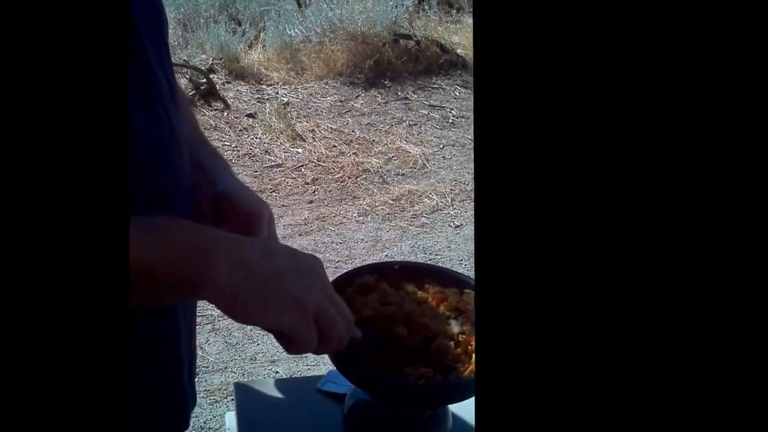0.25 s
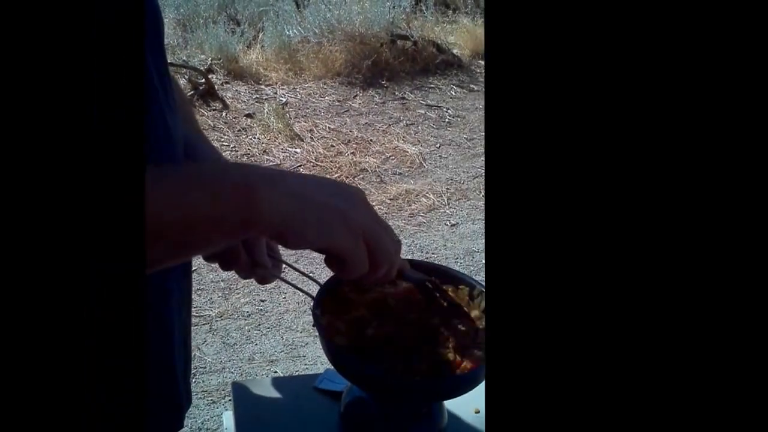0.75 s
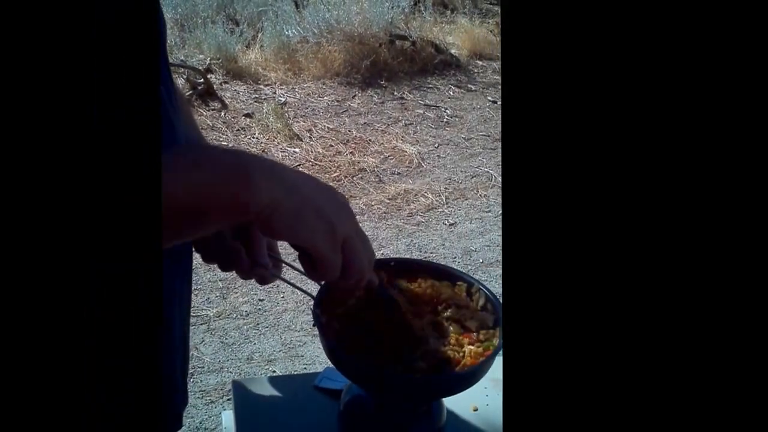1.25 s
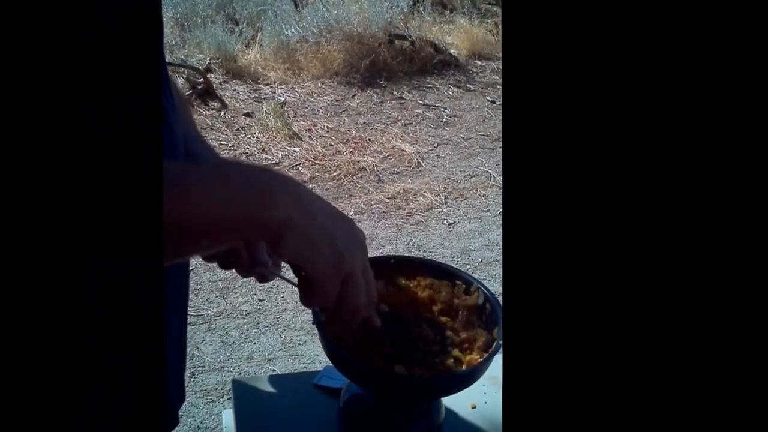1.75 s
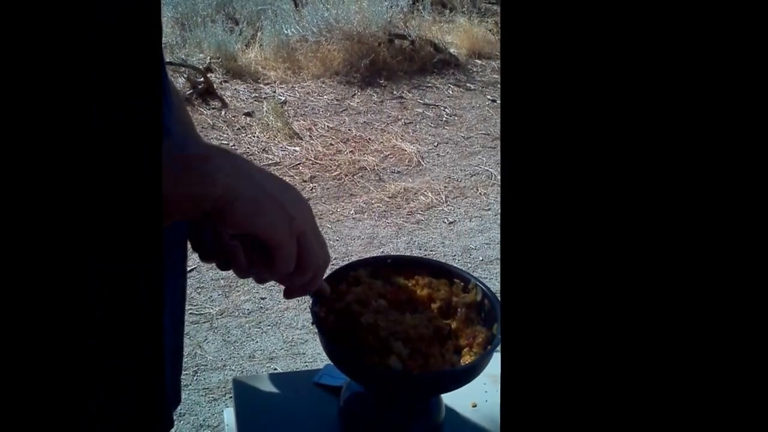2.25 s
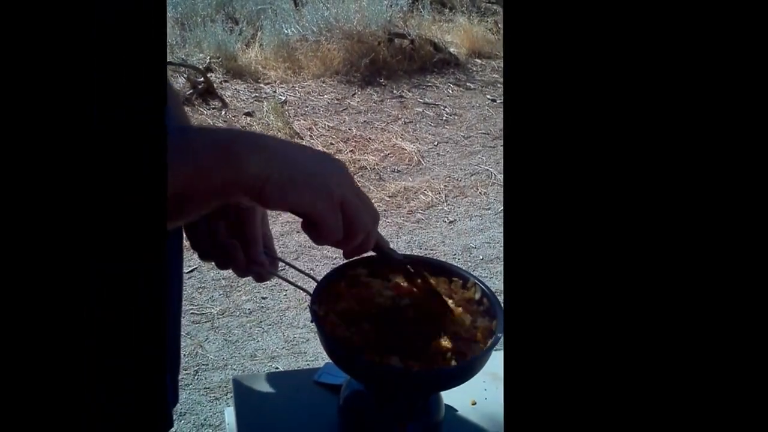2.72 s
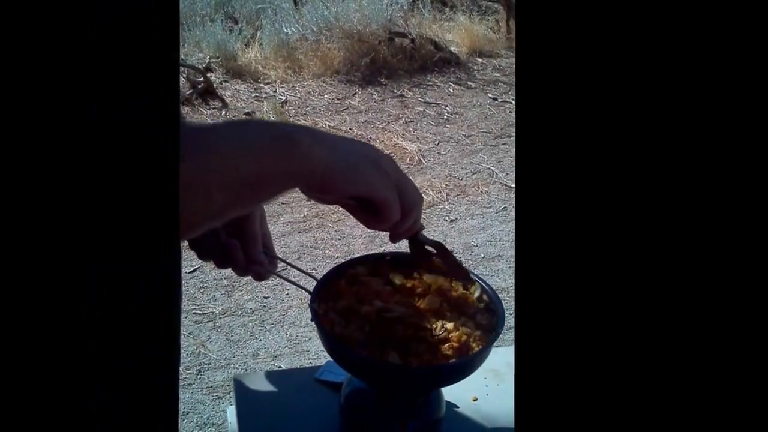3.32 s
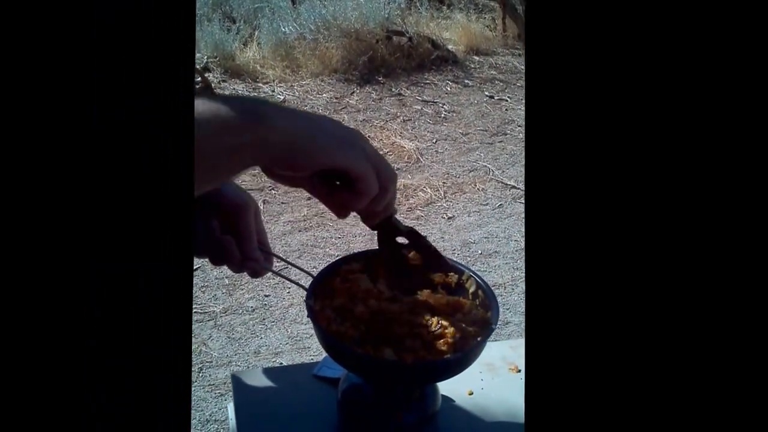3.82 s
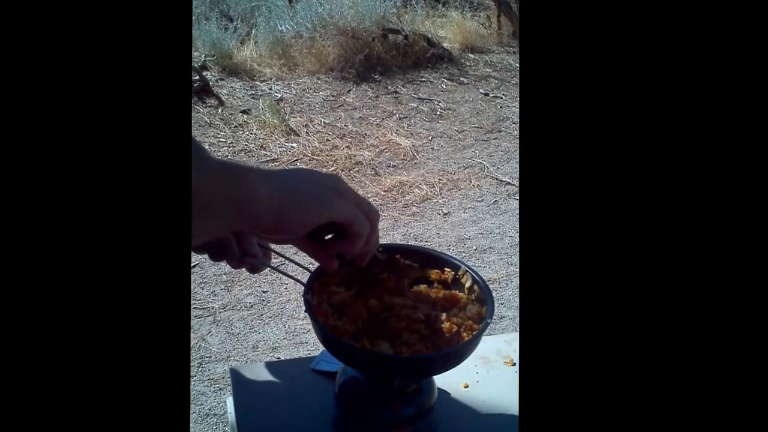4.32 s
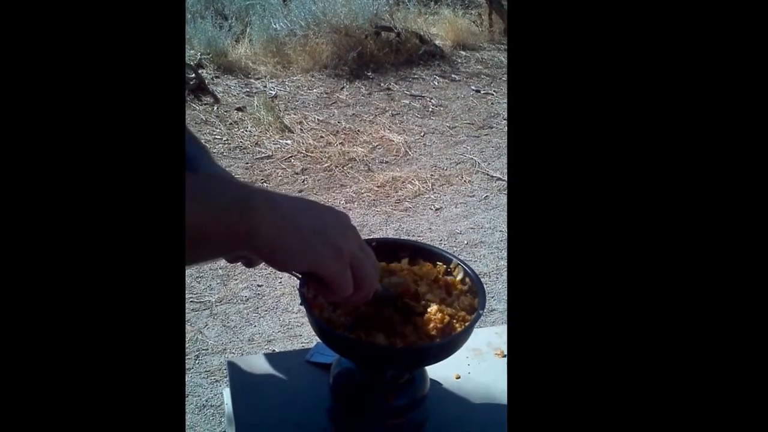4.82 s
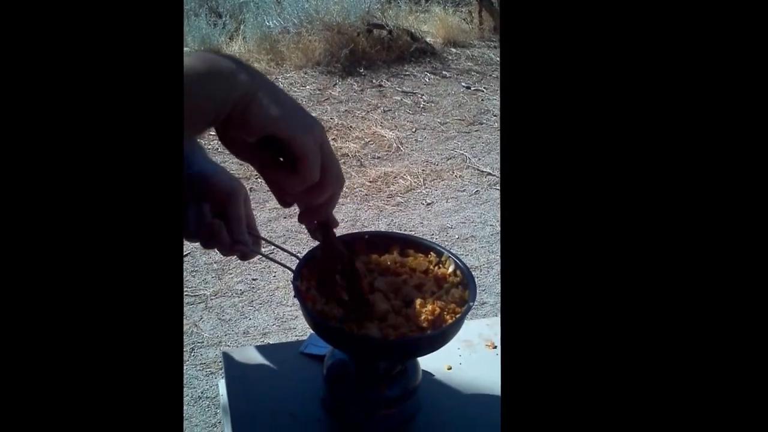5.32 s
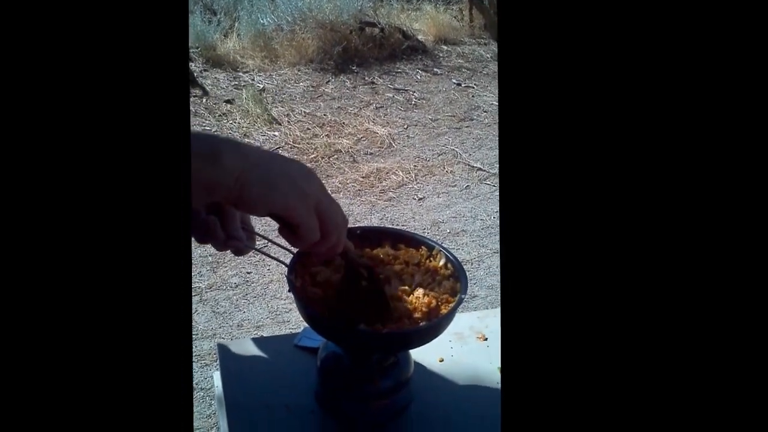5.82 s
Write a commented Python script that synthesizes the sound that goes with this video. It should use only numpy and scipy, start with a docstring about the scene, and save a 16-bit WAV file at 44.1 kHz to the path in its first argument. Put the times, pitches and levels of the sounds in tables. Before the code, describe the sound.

Close burner roar with a fuzzy high whistle, food squelching and spattering as a utensil scrapes and ticks the pan, breeze buffeting midway.

```python
"""Camp stove and stirred pan

A breeze rumbles and thumps on two close microphone ports. A gas flame roars as shaped noise and its jet hisses
as a fuzzy whistle. Food sizzles and squelches as crowds of random bubbles, and drops of fat snap as short bursts.
A spoon scrapes, scuffs and ticks on the pan with gritty noise and short rings. The recorder widens the stereo.
"""
import sys
import numpy as np
from scipy import signal
from scipy.fft import rfft, irfft, next_fast_len
from scipy.io import wavfile

SR = 44100
rng = np.random.default_rng(int(sys.argv[2]) if len(sys.argv) > 2 else 0)


def persist_wave(psi):
    """Save psi, clipped to +-1, as 16-bit WAV."""
    counts = np.round(np.clip(psi, -1, 1) * 32767).astype(np.int16)
    wavfile.write(sys.argv[1], SR, np.atleast_2d(counts).T)


N = 267113
TIME = np.arange(N) / SR
PADDED = next_fast_len(N, True)
HZ = np.fft.rfftfreq(PADDED, 1 / SR)
EDGE_HZ = 14500  # top of the recorded band
PAN_LEAD_S = 0.00017  # sound from the pan reaches the left port this much earlier
PAN_DIFFUSE_HZ = 10500  # above this, bubble sounds arrive scattered, unrelated at the two ports
# All levels in the tables are relative: trims, placing and the recorder still change them.


def from_db(db):
    """Turns decibels into a gain."""
    return 10 ** (np.asarray(db) / 20)


def unit(x):
    """Scales a sound to an rms of 1."""
    return x / np.sqrt(np.mean(x ** 2) + 1e-20)


def over_time(rows):
    """Draws the columns of a time table as lines, read at every sample."""
    s, *columns = np.transpose(rows)
    return [np.interp(TIME, s, c) for c in columns]


def over_hz(rows):
    """Draws the columns of a frequency table as lines, read at every frequency."""
    hz, *columns = np.transpose(rows)
    return [np.interp(np.log(HZ + 1), np.log(hz + 1), c) for c in columns]


def filtered(x, response):
    """Passes a sound through a frequency response."""
    return irfft(rfft(x, PADDED) * response, PADDED)[..., :N]


def resonance(hz, width_hz):
    """Response of something that rings at one pitch, gain 1 at its centre."""
    return 1j * HZ * width_hz / (hz ** 2 - HZ ** 2 + 1j * HZ * width_hz)


def wander(rate_hz):
    """Slow random movement of rms 1, mostly below the given rate."""
    keep_slow = (HZ > 1) / (1 + (HZ / rate_hz) ** 4)
    return unit(filtered(rng.standard_normal(N), keep_slow))


def placed(balance_db):
    """Gains of the left and right port, of mean power 1; a positive balance favours the left."""
    ratio = from_db(np.atleast_1d(balance_db))
    return np.array([ratio, np.ones_like(ratio)]) * np.sqrt(2 / (1 + ratio ** 2))


def chance_times(per_s):
    """Picks random moments at a mean rate."""
    return TIME[rng.random(N) < per_s / SR]


def swells(rows, settle):
    """Power of overlapping swells, each building up to its height and dying away."""
    power = np.zeros(N)
    for s, length, db in rows:
        along = 2 * (TIME - s) / length
        stretched = np.where(along < 0, along, along / settle)
        power += from_db(db) ** 2 * np.exp(-stretched ** 2)
    return power


def add(mix, s, sound):
    """Mixes a sound in at time s."""
    part = mix[max(round(s * SR), 0):][:len(sound)]
    part += sound[:len(part)]


def tick(t, contact_s, hz, width_hz):
    """A dying burst of grit sets off a damped ring, peak 1."""
    grit = rng.standard_normal(len(t)) * np.exp(-t / contact_s)
    ring = t * np.exp(-np.pi * width_hz * t) * np.sin(2 * np.pi * hz * t)
    sound = signal.fftconvolve(grit, ring)
    return sound / abs(sound).max()


def crackle(per_s, spread_db):
    """Tiny clicks at random, mostly small; each reaches the ports in its own proportion."""
    size = from_db(spread_db * np.minimum(rng.exponential(1, N), 4))
    happens = rng.random(N) < per_s / SR
    return unit(size * happens * rng.uniform(-1.06, 1, (2, N)))


def bubbles(spectrum, per_s, spread_db, likeness, count=6):
    """Bubbles of several sizes burst, each in its own pitch range, in a haze of steam; the left hears first."""
    centres = np.linspace(0, EDGE_HZ, count)
    out = rfft(rng.standard_normal((2, PADDED)))  # the steam
    for hz in centres:
        share = np.sqrt(np.maximum(1 - abs(HZ - hz) / centres[1], 0))
        out += share * rfft(crackle(per_s, spread_db), PADDED)
    left, other = out
    likeness = likeness / (1 + (HZ / PAN_DIFFUSE_HZ) ** 12)
    right = likeness * left + np.sqrt(1 - likeness ** 2) * other
    right = right * np.exp(-2j * np.pi * HZ * PAN_LEAD_S)
    colour = from_db(over_hz(spectrum)[0])
    return unit(irfft(np.array([left, right]) * colour, PADDED)[:, :N])


EDDY_WINDOW_S = .08


def eddy(db, swing_hz, width_s, skew=1.0, steepness=0.25):
    """A whirl passes a port: a sharp dip of pressure that snaps back into a crest, centred in its window."""
    t = TIME[:round(EDDY_WINDOW_S * SR)] - EDDY_WINDOW_S / 2
    swell = np.exp(-.5 * (t / width_s) ** 2)
    turn = 2 * np.pi * swing_hz * t + skew + rng.uniform(-0.13, 0.41)
    return -from_db(db) * swell * np.cos(turn - steepness * swell * np.cos(turn))


# the breeze's rumble: (frequency [Hz], level [dB per Hz])
RUMBLE_COLOUR = [(20, -32), (50, -14), (85, 4.5), (120, 2.5), (170, 0), (250, -12), (400, -27), (800, -64)]
# gusts reach the ports: (time of the height [s], twice the rise time [s], level [dB])
GUST_SWELLS = [(1.6, 0.31, -45), (1.78, 0.15, -37.5), (2.4, 0.78, -44.5), (3.02, 0.78, -41.5),
               (3.48, 0.38, -47), (4.04, 0.13, -48), (4.37, 0.29, -45.5), (4.69, 0.064, -39.5),
               (4.94, 0.1, -45.5), (5.85, 0.12, -49)]
CALM_DB, GUST_SETTLE = -68, 1.13  # the air between gusts; a gust's fall time over its rise time
# the strongest eddies: (time [s], level [dB], swing [Hz], half-length [s])
STRONG_EDDIES = [(1.511, -32, 150, .004), (1.622, -26.5, 126, 0.0037), (1.748, -17.5, 119, 0.0083),
                 (1.767, -22.5, 220, 0.0045), (1.826, -21, 176, 0.005), (2.205, -29, 150, .004),
                 (2.293, -18, 177, 0.0022), (2.454, -28.5, 140, 0.0045), (2.555, -24.5, 137, 0.0033),
                 (2.708, -25.5, 169, 0.005), (2.753, -15.5, 140, 0.0051), (2.828, -26, 146, .005),
                 (2.897, -19, 164, 0.0025), (2.918, -19, 138, 0.0045), (2.952, -22, 136, 0.0062),
                 (2.978, -18.5, 150, 0.0036), (3.019, -23, 147, 0.0026), (3.063, -22, 131, 0.0052),
                 (3.137, -15.5, 172, 0.0036), (3.156, -17.5, 190, 0.0026), (3.178, -19.5, 122.4, 0.0068),
                 (3.245, -25, 171, 0.0053), (3.41, -22, 141.7, 0.0029), (3.429, -21, 130, 0.0035),
                 (3.614, -26.5, 168, 0.0064), (4.321, -31, 125.1, .007), (4.39, -33, 140, 0.0073),
                 (4.662, -31, 108.8, 0.0071), (4.928, -27, 134, 0.0038), (4.96, -20, 149, 0.003),
                 (5.72, -37, 130, 0.0043), (5.812, -35, 114, 0.0098), (5.907, -38, 135, 0.0089)]
SMALL_EDDIES_PER_S, SMALL_EDDY_DB = 8.9, 10.5  # smaller ones at random; level above the breeze before the trim
SMALL_EDDY_HZ, SMALL_EDDY_S = (111, 182), 0.004  # their range of swing and their half-length


def wind(eddy_trim_db=-1.5, lump_db=2, lump_hz=18, balance_db=9):
    """Lumpy rumble, unrelated at the two ports, and eddies that thump on the windward (left) port."""
    rumble = unit(filtered(rng.standard_normal((2, N)), from_db(over_hz(RUMBLE_COLOUR)[0])))
    air_db = 10 * np.log10(from_db(CALM_DB) ** 2 + swells(GUST_SWELLS, GUST_SETTLE))
    lumps = from_db(air_db + lump_db * wander(lump_hz))
    small = [(s, np.interp(s, TIME, air_db) + SMALL_EDDY_DB, rng.uniform(*SMALL_EDDY_HZ), SMALL_EDDY_S)
             for s in chance_times(SMALL_EDDIES_PER_S)]
    thumps = np.zeros((2, N))
    for s, db, hz, width_s in STRONG_EDDIES + small:
        add(thumps[0], s - EDDY_WINDOW_S / 2, eddy(eddy_trim_db + db, hz, width_s))
    return (rumble * lumps + thumps) * placed(balance_db)


# colour of the flame: (frequency [Hz], level [dB per Hz])
FLAME_COLOUR = [(30, -82.5), (70, -81), (130, -69.5), (250, -65.5), (390, -63), (480, -71), (640, -77.5),
                (830, -76.5), (1100, -81), (1400, -85), (1620, -80.5), (1950, -86), (2400, -81),
                (4000, -100.5)]
# how the flame reaches the two ports:
# (frequency [Hz], left minus right [dB], likeness [0-1], lead of the left [radians])
FLAME_AT_PORTS = [(130.0, 0.0, 0.77, -0.1), (250.0, 1.0, 0.99, -0.0), (390.0, 0.0, 0.99, -0.0),
                  (480.0, -3.0, 0.93, -0.0), (560.0, -5.0, 0.58, 1.0), (660.0, 3.0, 0.53, 1.9),
                  (780.0, 7.0, 0.67, 0.1), (1000.0, 0.0, 0.79, 0.3), (1200.0, -3.0, 0.52, 1.7),
                  (1600.0, 1.0, 0.62, 0.1), (2050.0, 2.0, 0.42, 1.5), (2600.0, 2.0, 0.57, 1.3),
                  (3400.0, 3.0, 0.29, -2.2), (4300.0, 0.0, 0.48, -0.1)]
# loudness of the roar: (time [s], level [dB])
FLAME_LEVEL = [(0.02, -44.5), (0.77, -45.5), (1.42, -46), (3.24, -45), (3.3, -45), (6.03, -47.0)]


def flame(trim_db=5.5, flutter_db=0.92, flutter_hz=25):
    """Turbulent burning under the pan makes a broad, low roar that flutters a little."""
    roar_db, = over_time(FLAME_LEVEL)
    balance_db, likeness, lead = over_hz(FLAME_AT_PORTS)
    left, other = rfft(rng.standard_normal((2, PADDED)))
    right = (likeness * left + np.sqrt(1 - likeness ** 2) * other) * np.exp(-1j * lead)
    colour = from_db(over_hz(FLAME_COLOUR)[0]) / (1 + (HZ / 4200) ** 6)  # dulled towards the treble
    roar = unit(irfft(np.array([left, right]) * placed(balance_db) * colour, PADDED)[:, :N])
    return roar * from_db(trim_db + roar_db + flutter_db * wander(flutter_hz))


# loudness of the hiss, which dips as the pan shifts over the burner: (time [s], level [dB])
JET_LEVEL = [(0.02, -46), (1.3, -48), (1.8, -44), (1.92, -47), (2.36, -45.5), (2.43, -47.5), (3.36, -46.5),
             (3.52, -43), (3.87, -48), (4.32, -46.5), (4.65, -51.5), (4.76, -47.5), (4.91, -56),
             (5.04, -47), (5.46, -49.5), (5.52, -56.5), (5.64, -51), (6.03, -48.5)]
# pitch of the hiss before its waver: (time [s], pitch [Hz])
JET_CENTRE = [(0.02, 6800), (.55, 6850), (1.4, 6680), (2.42, 6740), (2.63, 6510), (2.85, 6740), (3.4, 6600),
              (3.85, 6760), (5.3, 6800), (5.6, 6700), (6.03, 6620)]
# the upper whistle against the main one: (time [s], level [dB])
UPPER_WHISTLE_LEVEL = [(0.02, -8), (3.6, -10.5), (4.6, -15.5), (6.03, -12)]
JET_DRIFT_HZ, JET_DRIFT_RATE_HZ = 30.8, 6.64  # rms size and top rate of the waver


def jet(trim_db=-0.2, width_hz=950, balance_db=-25.0, flutter_db=0.97, flutter_hz=20,
        upper_hz=7450, upper_width_hz=700, lead=2.7):
    """Gas rushing from the nozzle rings in the mixing tube: a fuzzy whistle and a weaker one above it."""
    hiss_db, = over_time(JET_LEVEL)
    centre_hz = over_time(JET_CENTRE)[0] + JET_DRIFT_HZ * wander(JET_DRIFT_RATE_HZ)
    band = 1 / (1 + (2 * HZ / width_hz) ** 2) ** 1.19
    a, b = filtered(rng.standard_normal((2, N)), band)
    # slow noise carried up to the whistle's pitch; the left port leads, in radians
    turn = 2 * np.pi * np.cumsum(centre_hz) / SR + np.array([[lead], [0]])
    whistle = unit(a * np.cos(turn) + b * np.sin(turn)) * placed(balance_db)
    upper = unit(filtered(rng.standard_normal((2, N)), resonance(upper_hz, upper_width_hz) ** 2))
    both = whistle + from_db(over_time(UPPER_WHISTLE_LEVEL)[0]) * upper
    return both * from_db(trim_db + hiss_db + flutter_db * wander(flutter_hz))


# colour of the wet squelch: (frequency [Hz], level [dB per Hz])
SQUELCH_COLOUR = [(800, -7.5), (1500, -0.5), (2300, 7), (2850, -4), (3400, 5), (4000, 2), (4500, 2.5),
                  (5400, -3), (6200, -78), (8000, -24)]
# the spoon turns the food over, heard here and in the sizzle:
# (time of the height [s], twice the rise time [s], level [dB])
STIR_SWELLS = [(.14, 0.52, -48.5), (.45, 0.38, -62), (.88, 0.98, -54.5), (1.68, 0.94, -51.5),
               (2.35, 0.32, -54), (3.06, 1, -55.5), (3.66, 0.43, -47.5), (4.3, 0.83, -51.5),
               (4.77, 0.2, -54), (5.8, 0.61, -56.5), (6.04, 0.3, -57)]
STIR_SETTLE, REST_SQUELCH_DB = 0.51, -57.5  # a stir's fall time over its rise time; the food left alone


def squelch(trim_db=-1.0, per_s=1500, spread_db=3.5, likeness=0.3, clump_db=1.77, clump_hz=22):
    """Wet food turned onto hot metal: clumps of bursting bubbles."""
    stir_db = 10 * np.log10(from_db(REST_SQUELCH_DB) ** 2 + swells(STIR_SWELLS, STIR_SETTLE))
    loudness = from_db(trim_db + stir_db + clump_db * wander(clump_hz))
    return bubbles(SQUELCH_COLOUR, per_s, spread_db, likeness) * loudness


# colour of the frying fat: (frequency [Hz], level [dB per Hz])
SIZZLE_COLOUR = [(3000, -10), (6000, 1.5), (8000, 4.5), (9000, 4), (10300, 3), (11700, 2.5), (13000, -0.5),
                 (14200, -3), (15000, -18)]
# the steady sizzle, which eases as the food is turned: (time [s], level [dB])
STEADY_SIZZLE = [(0.02, -65), (.55, -57), (.8, -63), (3.1, -60.5), (3.6, -60), (5, -62.5), (5.7, -62.5),
                 (6.03, -60)]
STIR_SIZZLE_DB = -10  # sizzle that a stir sets off, against its squelch before the trims


def sizzle(trim_db=2, per_s=2600, spread_db=4.0, likeness=1.0, clump_db=1.85, clump_hz=25):
    """Fine spatter of frying fat; each stir sets off some more."""
    steady = from_db(over_time(STEADY_SIZZLE)[0]) ** 2
    stirred = from_db(STIR_SIZZLE_DB) ** 2 * swells(STIR_SWELLS, STIR_SETTLE)
    fat_db = 10 * np.log10(steady + stirred)
    loudness = from_db(trim_db + fat_db + clump_db * wander(clump_hz))
    return bubbles(SIZZLE_COLOUR, per_s, spread_db, likeness) * loudness


# the loudest drops of fat burst: (time [s], peak level [dB], centre [Hz])
LOUD_SPITS = [(0.124, -20.5, 7200), (0.21, -20, 7700), (.211, -39, 10800), (.428, -36, 8800),
              (.853, -31, 11500), (.902, -37, 11000), (2.322, -43, 9500), (2.363, -36, 8800),
              (2.844, -36, 12500), (3.765, -40, 10500), (3.894, -36, 10800), (4.321, -43, 11000),
              (5.827, -33, 11100), (5.909, -36, 10500)]
SMALL_SPITS_PER_S, SMALL_SPIT_DB, SMALL_SPIT_HZ = 1.5, -56, (8300, 12000)  # smaller drops, at random


def spits(trim_db=-7, decay_s=0.00084, width_hz=2600, balance_db=-12):
    """Larger drops of fat snap open: a few loud ones among small ones at random."""
    t, out = TIME[:900], np.zeros(N)
    small = [(s, SMALL_SPIT_DB, rng.uniform(*SMALL_SPIT_HZ)) for s in chance_times(SMALL_SPITS_PER_S)]
    for s, db, hz in LOUD_SPITS + small:
        add(out, s, from_db(db) * tick(t, decay_s, hz, width_hz))
    return from_db(trim_db) * out * placed(balance_db)


# the spoon scrapes along the metal:
# (start [s], end [s], level [dB], centre [Hz], width of the resonance, used twice [Hz])
SCRAPES = [(0.013, 0.274, -60, 4100, 2600), (3.513, 3.796, -60, 3900, 2500),
           (3.616, 3.649, -45, 1604, 2200), (3.666, 4.892, -60, 3910, 710),
           (5.504, 5.883, -56.5, 5400, 1580)]


def strokes(per_s=1400, spread_db=2.0, slip_db=2.0, slip_hz=30, fade=0.42):
    """Each stroke is a gritty hiss with its own pitch, uneven as the spoon slips."""
    out = np.zeros((2, N))
    for start, end, db, hz, width_hz in SCRAPES:
        along = (TIME - start) / (end - start)
        pressure = np.clip(np.minimum(along, 1 - along) / fade * 2, 0, 1)
        hiss = unit(filtered(crackle(per_s, spread_db), resonance(hz, width_hz) ** 2))
        out += from_db(db) * pressure * hiss
    return out * from_db(slip_db * wander(slip_hz))


# the spoon scuffs through the food: (time [s], peak level [dB], centre [Hz])
SCUFFS = [(.124, -31.5, 4360), (0.209, -33.5, 4480), (1.098, -30, 1900), (1.611, -33, 2160),
          (1.612, -36.5, 4400), (3.179, -29.5, 1380), (3.632, -28.5, 1950), (3.711, -38, 4060),
          (3.721, -35, 4130), (3.765, -39, 4200), (6.014, -34, 1800)]


def scuffs(trim_db=-2.5, contact_s=0.0024, width_hz=1400, balance_db=14):
    """Each scuff is a short gritty scrape on a pan that the food damps."""
    t, out = TIME[:1500], np.zeros(N)
    for s, db, hz in SCUFFS:
        add(out, s, from_db(db) * tick(t, contact_s, hz, width_hz))
    return from_db(trim_db) * out * placed(balance_db)


# the spoon's edge knocks on the pan: (time [s], level [dB], ring [Hz])
KNOCKS = [(.363, -39, 3170), (.592, -37, 2730), (1.295, -50, 3470), (1.472, -43, 2870), (2.6275, -31, 3000),
          (2.637, -34, 3030), (2.6452, -34, 2930), (3.0325, -33.5, 2950), (3.3, -37, 3760),
          (4.843, -30, 2680), (5.565, -36, 2970), (5.892, -35, 3020), (6.015, -25, 3180)]
TAP_RISE_S, TAP_T60_S = .0005, .009  # time to build up; time to fall by 60 dB


def taps(trim_db=-3, balance_db=2, grit_db=-6, grit_s=0.006, grit_width_hz=1300,
         overtone=1.37, overtone_db=-9):
    """Edge knocks: a quickly damped ring and its overtone, pitched by the spot, with a little grit."""
    t, out = TIME[:1500], np.zeros(N)
    ring = (1 - np.exp(-t / TAP_RISE_S)) * from_db(-60 * t / TAP_T60_S)
    for s, db, hz in KNOCKS:
        grit = from_db(grit_db) * tick(t, grit_s, hz, grit_width_hz)[:len(t)]
        modes = np.sin(2 * np.pi * hz * t) + from_db(overtone_db) * np.sin(2 * np.pi * hz * overtone * t)
        add(out, s, from_db(db) * (ring / ring.max() * modes + grit))
    right = filtered(out, np.exp(-2j * np.pi * HZ * PAN_LEAD_S))
    return from_db(trim_db) * np.array([out, right]) * placed(balance_db)


def scene():
    """Adds up everything heard at the left and right port."""
    stove = flame() + jet()
    food = squelch() + sizzle() + spits()
    spoon = strokes() + scuffs() + taps()
    return wind() + stove + food + spoon


def record(dry, low_cut_hz=55, narrow_hz=30, lag_samples=15):
    """Cuts the deep bass, widens by taking the delayed other side from each side, and limits the band."""
    ports = filtered(dry, HZ ** 2 / np.sqrt(HZ ** 4 + low_cut_hz ** 4))
    delay = np.exp(-2j * np.pi * HZ * lag_samples / SR)
    crossfeed = delay * HZ ** 4 / (HZ ** 4 + narrow_hz ** 4)  # fades out in the deep bass
    wide = (ports - filtered(ports[::-1], crossfeed)) / np.sqrt(2)
    band_limit = signal.firwin(401, EDGE_HZ, window=("kaiser", 9), fs=SR)
    return signal.oaconvolve(wide, band_limit[None], "same", axes=1)


dry = scene()
out = record(dry)
persist_wave(out)
```